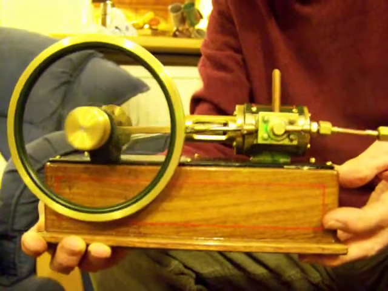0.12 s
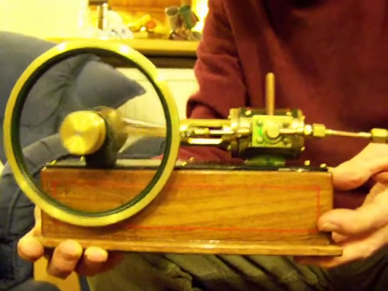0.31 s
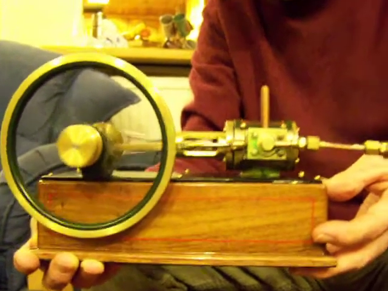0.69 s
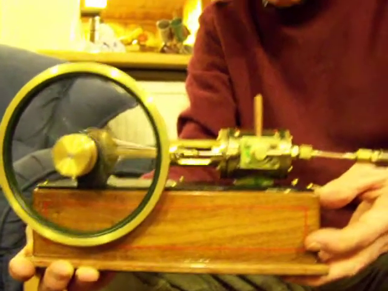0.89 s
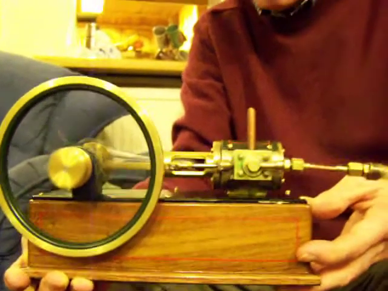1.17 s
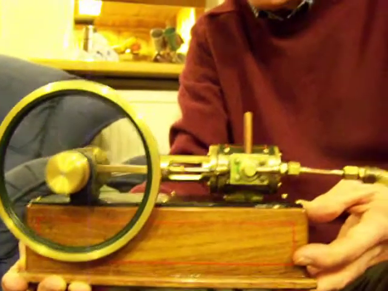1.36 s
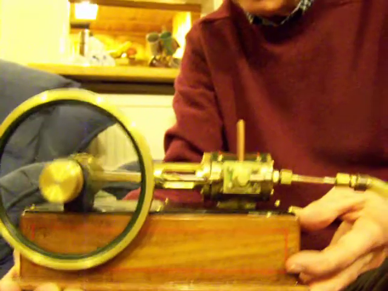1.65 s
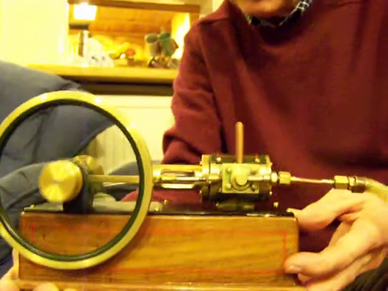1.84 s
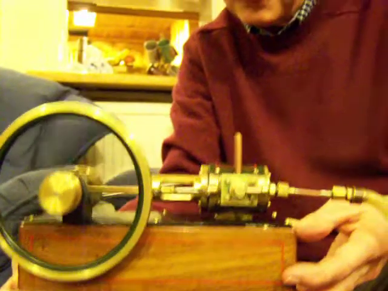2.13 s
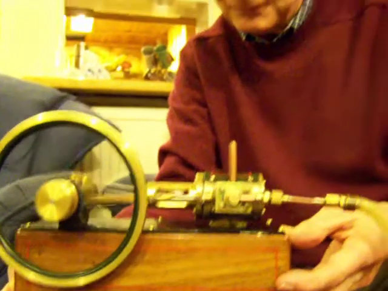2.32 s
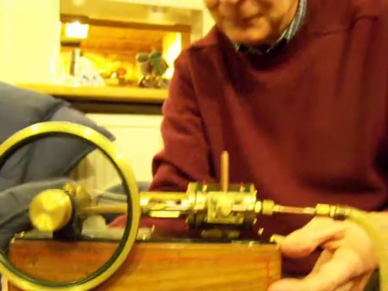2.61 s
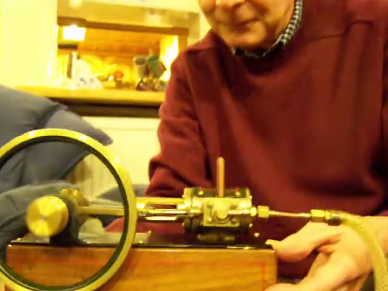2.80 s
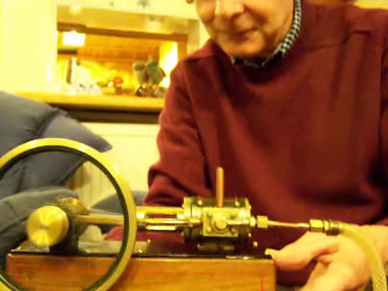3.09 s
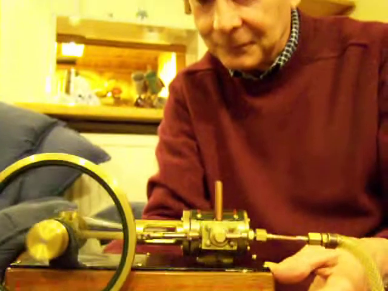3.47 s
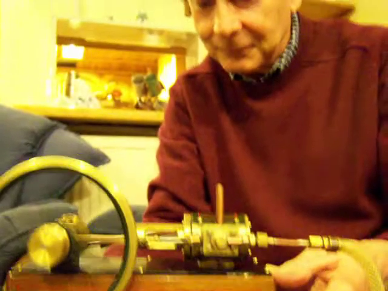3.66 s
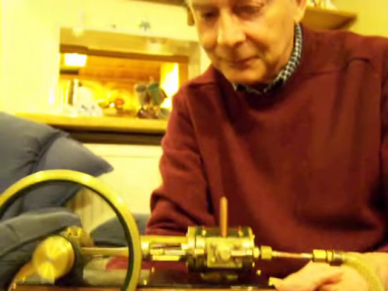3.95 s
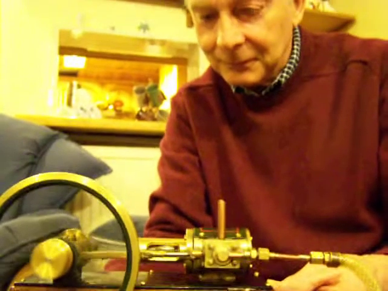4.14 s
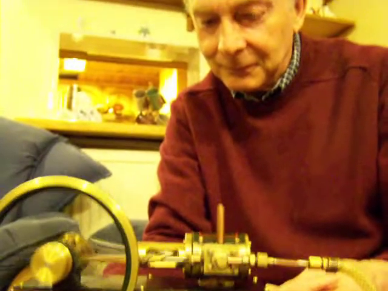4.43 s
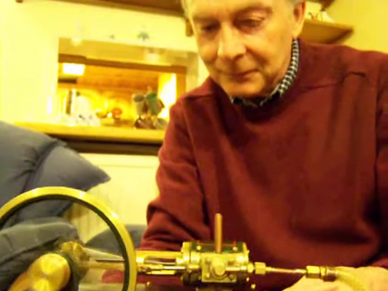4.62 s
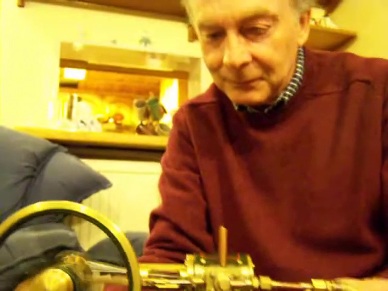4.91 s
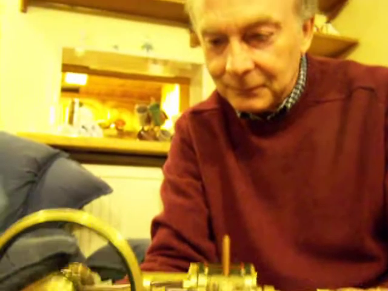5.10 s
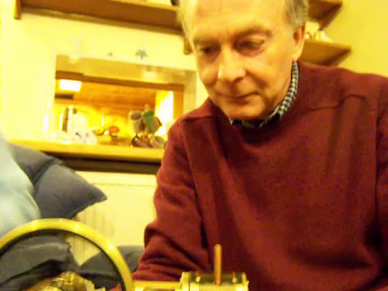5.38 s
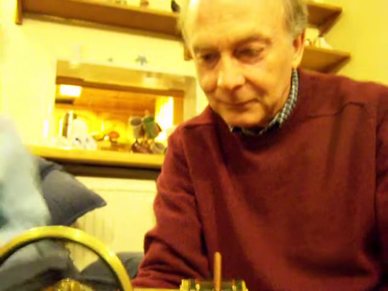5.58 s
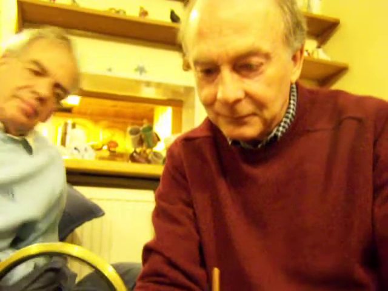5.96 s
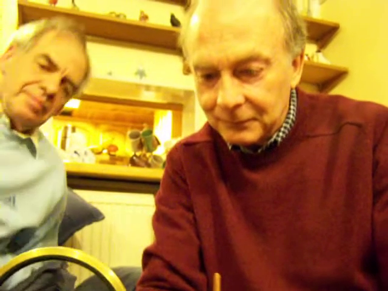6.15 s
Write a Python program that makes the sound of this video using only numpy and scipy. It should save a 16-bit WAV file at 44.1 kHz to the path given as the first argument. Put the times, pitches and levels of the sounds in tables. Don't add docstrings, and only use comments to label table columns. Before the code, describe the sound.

Close, bright chuffing hiss from a tiny piston engine on a hollow wooden base, ticking and tapping evenly in a quiet room.

```python
import sys
import numpy as np
from scipy import signal
from scipy.fft import rfft, irfft, next_fast_len
from scipy.io import wavfile
from scipy.ndimage import uniform_filter1d, map_coordinates

SR = 44100
rng = np.random.default_rng(int(sys.argv[2]) if len(sys.argv) > 2 else 0)


def materialize(psi):
    bounded = np.clip(np.atleast_2d(psi).T, -1, 1)
    quanta = np.round(bounded * 32767).astype(np.int16)
    wavfile.write(sys.argv[1], SR, quanta)


def gain_from_decibels(decibels):
    exponent = np.asarray(decibels, float) / 20
    return 10 ** exponent


N = 276066
TIME = np.arange(N) / SR

# start_s, knock_db, valve_tap_db, puff_db
OUT_STROKES = [(0.0746, -24.5, -18, -17.5), (0.394, -23.5, -17.5, -18), (0.6921, -22, -19, -17),
               (0.9735, -21.5, -17.5, -14.5), (1.2416, -22, -17.5, -16.5), (1.505, -20, -16.5, -19),
               (1.7682, -20, -18.5, -14.5), (2.0321, -21.5, -18, -17.5), (2.306, -23, -20, -18.5),
               (2.605, -25, -19.5, -25.5), (2.9141, -25, -23, -19.5), (3.2268, -23.5, -22, -22),
               (3.537, -24.5, -20.5, -19.5), (3.841, -23.5, -17.5, -17.5), (4.1342, -23.5, -19.5, -18.5),
               (4.422, -23, -16.5, -19), (4.7038, -24.5, -17, -19.5), (4.9862, -22.5, -18.5, -19),
               (5.2675, -24.5, -20.5, -20.5), (5.548, -23.5, -17, -20.5), (5.83, -23, -19.5, -20),
               (6.1132, -23.5, -17.5, -18.5)]
# tap_s, tap_db, puff_db, puff_lead_ms (puff ahead of the tap)
RETURN_STROKES = [(0.2739, -18.5, -11.5, 19), (.581, -16, -11.5, 19.3), (.87, -16.5, -12.5, 21.4),
                  (1.1426, -16.5, -12.5, 25), (1.4064, -20.5, -11.5, 21), (1.6698, -19.5, -12.5, 18.5),
                  (1.9306, -20, -12.5, 18.5), (2.203, -23.5, -14, 18), (2.4879, -20, -15.5, 17),
                  (2.795, -19, -15, 19), (3.11, -18, -13, 20.3), (3.4204, -20, -12.5, 19.5),
                  (3.724, -16.5, -14.5, 17), (4.0235, -18, -14, 18), (4.3123, -17.5, -13, 16),
                  (4.5978, -17, -13, 19.5), (4.878, -16.5, -13, 19), (5.16, -17.5, -15, 19),
                  (5.4453, -17, -13, 21), (5.7248, -19, -14, 19.3), (6.0051, -19, -14, 21.4)]
SLACK_BLOW_DB = [2, 3, .6, 1.5, 0.5, 1, 2, -3, -6, -2.1, -2, 0, 2, -1.5, 0.3, -2.5, -0.5, -0.2, -0.5, 1.1,
                 0, 0]
# time_s, strength_db
PRESSURE = [(0.0, -28.5), (0.09, -30), (0.16, -28.5), (1.08, -27), (1.64, -27), (1.9, -28), (2.94, -29),
            (4.18, -28), (4.29, -27.5), (4.71, -28), (4.81, -28), (6.26, -29)]
# pitch_hz, then level_db struck by knock, rebound, out tap, return tap, low tick, high tick
FRAME_MODES = [(290, -13, -28, -27.5, -31, -29, -36.5), (521.4, -5.5, -31, -23, -41, -23.5, -30),
               (582.5, -5.5, -22, -25.5, -41, -27, -29), (672, -5, -9, -15.5, -20, -8.5, -28.5),
               (950, -6.5, -18, -8, -16, -16, -22.5), (1065, -21.5, -6.5, -23, -17, -5, -32.5),
               (1213, -30, -11.5, -18.5, -18.5, -0.5, -28.5), (1642.5, -10.5, -13, 0.5, -6, -4, -9.5),
               (1716, -10.5, -14, -8, -7.5, -8, -10.5), (2080, -5.5, -10.5, -1.5, -10.5, -4, 0),
               (2600, -3, -31, -10, -25, -22.5, 3)]
# pitch_hz, t60_s
FRAME_RING = [(270, .022), (510, .048), (700, .03), (960, .04), (1260, .028), (1670, .034), (2180, .018),
              (2620, .014)]
# crack_db, rattle_span_s, rattle_db
CONTACTS = [
    (-10, 0.0049, -8.5),
    (-16, 0.011, -15),
    (8, 0.009, -18.5),
    (-9, .005, -31),
    (-14.5, 0.007, -10.5),
    (2, 0.0061, -27),
]
# freq_hz, density_db (per Hz)
JET_COLOUR = [(410, -27), (700, -23), (804, -23), (1510, -20), (1680, -14.5), (1910, -22), (2120, -17),
              (3730, -1.5), (4420, -13.5), (5470, -11.5), (7530, -20.5), (8200, -21), (8930, -36.5),
              (11600, -75), (19600, -120)]
# pitch_hz, width_hz, level_db
CHEST_MODES = [
    (4024, 570, -3),
    (5090, 1100, -6.5),
    (6760, 470, -19.5),
]
# freq_hz, density_db (per Hz)
OUT_SPRAY = [(500, -23.5), (1000, -16.5), (2000, -11), (3400, -5.5), (4050, 5), (4500, -5), (5000, 1),
             (6000, -7), (7500, -26), (9000, -35)]
# freq_hz, density_db (per Hz)
RETURN_SPRAY = [(500, -30.5), (1100, -12.5), (2100, -9.5), (3400, -12.5), (4050, 3), (4500, -1),
                (5200, -4.5), (6000, -19), (6900, -12.5), (7800, -21.5), (9000, -31.5)]
# freq_hz, density_db (per Hz)
AIR_COLOUR = [(12, -31), (20, -7.5), (70, 8), (248, -9), (295, 7), (507, -6.5), (624, 4), (805, -9.5),
              (900, 2.5), (1170, -23.5), (1980, -120)]
# freq_hz, t60_s
ROOM_DECAY = [(300, 0.063), (2000, 0.68), (8000, 0.041)]
# start_s, peak_db, pitch_hz
BUMPS = [
    (0.294, -48, 73),
    (3.424, -46, 90),
]
# freq_hz, level_db
MIC_RESPONSE = [(20, -2), (7500, 3), (8300, -3.5), (8800, -7), (9100, -24.5), (9400, -84)]
# freq_hz, width_hz, depth_db
NEAR_DIPS = [(901, 350, -3), (1560, 280, -6), (1976, 360, -2), (2590, 100, 0), (3184, 82, -11.5),
             (3715, 403, -8), (4300, 65, -3.5), (5530, 440, -3.5), (7660, 830, 2)]

OUT_TAP_TURN, LOW_TICK_TURN, HIGH_TICK_TURN, RETURN_TAP_TURN = .077, .196, .221, .63
OUT_DEAD_CENTRE, RETURN_DEAD_CENTRE = .035, .515
OPENS, WIDE_OPEN, STARTS_CLOSING = (.05, .04), (.13, .12), (.62, .82)
WIDE_DB, SWELL_DB, SHUT_DB = (-0.5, -2), (2, 1.5), -7
PIPE_HZ, PIPE_SLIDE_HZ, PIPE_WIDTH_HZ = (4400, 4430), (-170, 0), (560, 340)
PORT_HZ, PORT_ARCH_HZ, PORT_SLIDE_HZ = (5900, 5900), (180, 450), (-200, 380)
PORT_DB, SEAT_DB, CHEST_DB = (-12, -10.5), (-20, -40), (-9.5, -5.5)
JET_DB = (1, 0)


def unit(x):
    return x / np.sqrt(np.mean(np.abs(x) ** 2) + 1e-20)


def along(points, hz):
    f, v = np.transpose(points)
    return np.interp(np.log(hz + 1), np.log(f + 1), v)


def filtered(x, response):
    m = next_fast_len(N + SR // 2)
    return irfft(rfft(x, m) * response(np.fft.rfftfreq(m, 1 / SR)), m)[..., :N]


def wobble(rate):
    return map_coordinates(rng.standard_normal(int(N * rate / SR) + 4), [TIME * rate])


def hiss(spectrum, spit_db):
    raw = gain_from_decibels(spit_db * wobble(400)) * rng.standard_normal(N)
    return unit(filtered(raw, lambda hz: gain_from_decibels(along(spectrum, hz))))


def sliding_tone(centre_hz, width_hz):
    slow = filtered(rng.standard_normal((2, N)), lambda hz: 1 / (1 + 2j * hz / width_hz) ** 2)
    carrier = np.exp(2j * np.pi * np.cumsum(centre_hz) / SR)
    return unit(np.real((slow[0] + 1j * slow[1]) * carrier))


def crank_marks():
    knock, tap = np.array(OUT_STROKES)[:, 0], np.array(RETURN_STROKES)[:, 0]
    s = np.r_[2 * knock[0] - knock[1], knock, 2 * knock[-1] - knock[-2], tap]
    turns = np.r_[np.arange(-1, len(knock) + 1), np.arange(len(tap)) + RETURN_TAP_TURN]
    order = np.argsort(s)
    return s[order], turns[order]


def each_turn(share):
    s, turns = crank_marks()
    return np.interp(np.arange(len(OUT_STROKES)) + share, turns, s)


def crank():
    turn = (np.interp(TIME, *crank_marks()) - OUT_DEAD_CENTRE) % 1
    out_length = RETURN_DEAD_CENTRE - OUT_DEAD_CENTRE
    returning = turn > out_length
    done = np.where(returning, (turn - out_length) / (1 - out_length), turn / out_length)
    return returning.astype(int), done


def by_stroke(pair, which):
    return np.array(pair)[which]


def valve_flow_db(which, done):
    flows = []
    for k in range(2):
        times = [OPENS[k], WIDE_OPEN[k], STARTS_CLOSING[k], 1]
        levels_db = [SHUT_DB, WIDE_DB[k], WIDE_DB[k] + SWELL_DB[k], SHUT_DB]
        flows.append(np.interp(done, times, levels_db))
    return np.choose(which, flows)


def exhaust_pipe(which, done):
    pipe_hz = by_stroke(PIPE_HZ, which) + by_stroke(PIPE_SLIDE_HZ, which) * done
    drift_hz = 30 * wobble(30)
    main = np.choose(which, [sliding_tone(pipe_hz + drift_hz, width) for width in PIPE_WIDTH_HZ])
    return main + gain_from_decibels(-11.5) * sliding_tone(.49 * pipe_hz, 430)


def port(which, done):
    arch_hz = by_stroke(PORT_ARCH_HZ, which) * np.sin(np.pi * done)
    port_hz = by_stroke(PORT_HZ, which) + by_stroke(PORT_SLIDE_HZ, which) * done + arch_hz
    waking = np.clip(done / .3, 0, 1)
    level = gain_from_decibels(by_stroke(PORT_DB, which) + 1.5 * wobble(25))
    note = level * sliding_tone(port_hz + 90 * wobble(14), 480)
    whistle = gain_from_decibels(by_stroke(SEAT_DB, which)) * sliding_tone(np.full(N, 7200), 380)
    return waking * (note + whistle)


def valve_chest(which):
    notes = sum(gain_from_decibels(db) * sliding_tone(np.full(N, hz), width) for hz, width, db in CHEST_MODES)
    return gain_from_decibels(by_stroke(CHEST_DB, which)) * notes


def jet(which, flow_db, pressure_db):
    low_share = lambda hz: 1 / (1 + (hz / 4300) ** 6)
    low = filtered(hiss(JET_COLOUR, spit_db=0.16), low_share)
    high = filtered(hiss(JET_COLOUR, spit_db=0.5), lambda hz: 1 - low_share(hz))
    swing_db = pressure_db - pressure_db.mean()
    swell = gain_from_decibels(swing_db + by_stroke(JET_DB, which) + .27 * flow_db + 1.3 * wobble(30))
    return swell * (gain_from_decibels(-33) * unit(low) + gain_from_decibels(-34.5) * unit(high))


def strokes():
    which, done = crank()
    flow_db = valve_flow_db(which, done)
    pressure_db = np.interp(TIME, *np.transpose(PRESSURE))
    flutter_db = 1.4 * wobble(45) + 0.65 * wobble(6.2)
    sung = exhaust_pipe(which, done) + port(which, done) + valve_chest(which)
    return gain_from_decibels(pressure_db - 0.07 + flow_db + flutter_db) * sung + jet(which, flow_db, pressure_db)


def room_air():
    return gain_from_decibels(-57.5) * hiss(AIR_COLOUR, spit_db=-5.0)


def contact_times():
    knocks, return_taps = [row[:2] for row in OUT_STROKES], [row[:2] for row in RETURN_STROKES]
    out_taps = list(zip(each_turn(OUT_TAP_TURN), np.array(OUT_STROKES)[:, 2]))
    tick_db = 1.2 * rng.standard_normal((len(OUT_STROKES), 2)) + np.array(SLACK_BLOW_DB)[:, None]
    low_ticks = list(zip(each_turn(LOW_TICK_TURN), -27 + tick_db[:, 0]))
    high_ticks = list(zip(each_turn(HIGH_TICK_TURN), -20 + tick_db[:, 1]))
    rebounds = [(s + 0.00523, db + 0.1) for s, db in knocks]
    rebounds += [(s - .044, -34.5) for s, db in return_taps]
    return knocks, rebounds, out_taps, return_taps, low_ticks, high_ticks


def strike(mode_hz, mode_db, decay_db, crack_db, t):
    hz = mode_hz * (1 + .015 * rng.standard_normal(mode_hz.shape))
    strength_db = mode_db + 1.5 * rng.standard_normal(mode_hz.shape)
    ring = (gain_from_decibels(strength_db + decay_db) * np.sin(2 * np.pi * hz * t)).sum(0)
    crack = gain_from_decibels(crack_db - 60 * t / .005) * rng.standard_normal(len(t))
    crack = crack - uniform_filter1d(crack, size=45)
    return crack - ring * (1 - np.exp(-t / .0006))


def linkage():
    out, t = np.zeros(N + SR), np.arange(SR // 8) / SR
    modes = np.array(FRAME_MODES)
    mode_hz = modes[:, :1]
    decay_db = -60 * t / along(FRAME_RING, mode_hz)
    for kind, rows in enumerate(contact_times()):
        crack_db, span_s, rattle_db = CONTACTS[kind]
        for s, db in rows:
            blow = gain_from_decibels(db + 1.5) * strike(mode_hz, modes[:, kind + 1, None], decay_db, crack_db, t)
            out[round(s * SR):][:len(t)] += blow
            bounce = gain_from_decibels(rattle_db + 17.5) * np.diff(blow, prepend=0)
            for share in (np.arange(3) + rng.random(3)) / 3:
                out[round((s + .002 + span_s * share) * SR):][:len(t)] += bounce
    radiated = lambda f: (1j * f / (230 + 1j * f)) ** 2 / (1 + 1j * f / 6000) ** 4
    return filtered(out[:N], radiated)


def puffs(rows, spectrum, rise_s, hold_s, fall_s, gain_db):
    shape = np.zeros(N)
    for s, db in rows:
        opening = 1 / (1 + np.exp(np.clip((s - TIME) / rise_s, -50, 50)))
        emptying = np.exp(-(np.maximum(TIME - s - hold_s, 0) / fall_s) ** 2)
        shape += gain_from_decibels(db + gain_db) * opening * emptying
    spray = hiss(spectrum, spit_db=2.7)
    return shape * spray / np.sqrt(np.abs(uniform_filter1d(spray ** 2, size=600)))


def out_puffs():
    rows = zip(each_turn(OUT_TAP_TURN) + .001, np.array(OUT_STROKES)[:, 3])
    return puffs(rows, OUT_SPRAY, rise_s=.004, hold_s=0.016, fall_s=0.0048, gain_db=-4.5)


def return_puffs():
    rows = [(s - lead_ms * .001, db) for s, tap_db, db, lead_ms in RETURN_STROKES]
    return puffs(rows, RETURN_SPRAY, rise_s=.0022, hold_s=0.0073, fall_s=0.011, gain_db=-6.5)


def room(x):
    hz, t, z = signal.stft(rng.standard_normal(SR // 2), SR, nperseg=256)
    fading = z * gain_from_decibels(-60 * t / along(ROOM_DECAY, hz)[:, None])
    tail = signal.istft(fading, SR, nperseg=256)[1]
    return signal.fftconvolve(np.pad(x, (250, 0)), tail / np.linalg.norm(tail))[:N]


def handling():
    out = np.zeros(N)
    for s, db, hz in BUMPS:
        out += gain_from_decibels(db) * np.exp(-((TIME - s - .01) / 0.0118) ** 2) * np.sin(2 * np.pi * hz * TIME)
    return out


def scene():
    blows = linkage() + out_puffs() + return_puffs()
    mix = strokes() + room_air() + blows + gain_from_decibels(-13) * room(blows) + handling()
    return mix[None]


def roll_off(x):
    return signal.sosfilt(signal.butter(12, 9080, fs=SR, output="sos"), x)


def record(dry):
    ceiling = .52
    rounded = ceiling * np.tanh(dry / ceiling)

    def dip(f, c, w, db):
        return (c * c - f * f + 1j * f * w * gain_from_decibels(db)) / (c * c - f * f + 1j * f * w)

    def colour(hz):
        return gain_from_decibels(along(MIC_RESPONSE, hz)) * np.prod([dip(hz, *row) for row in NEAR_DIPS], axis=0)

    return roll_off(filtered(rounded, colour))


dry = scene()
out = record(dry)
materialize(out)
```